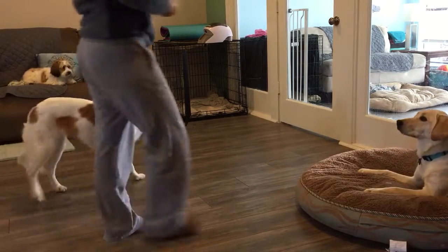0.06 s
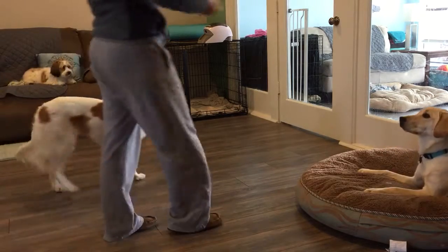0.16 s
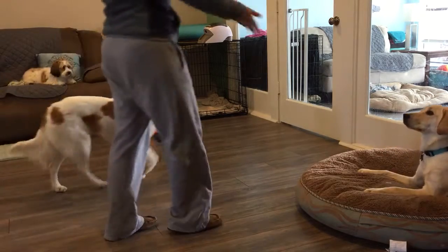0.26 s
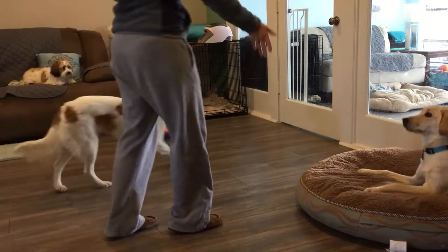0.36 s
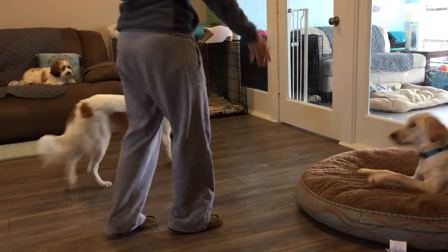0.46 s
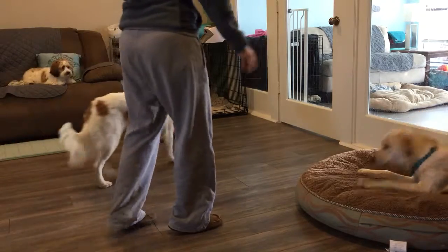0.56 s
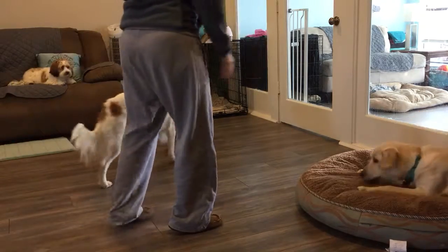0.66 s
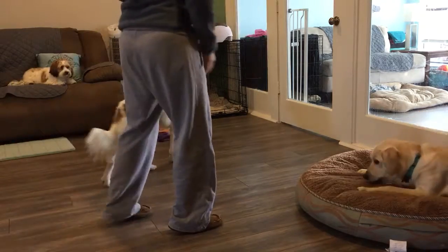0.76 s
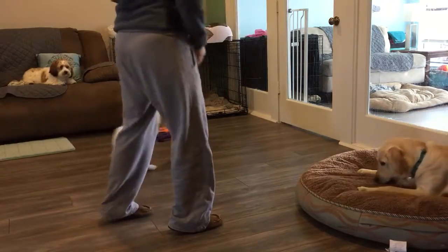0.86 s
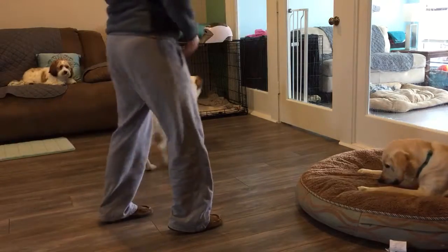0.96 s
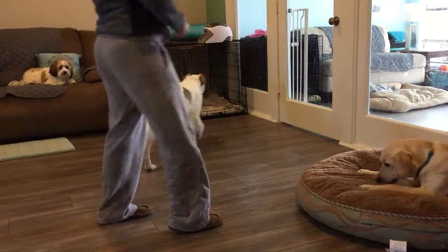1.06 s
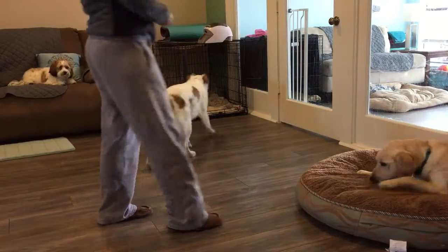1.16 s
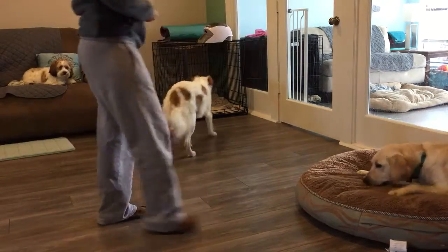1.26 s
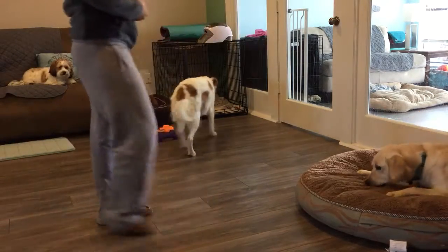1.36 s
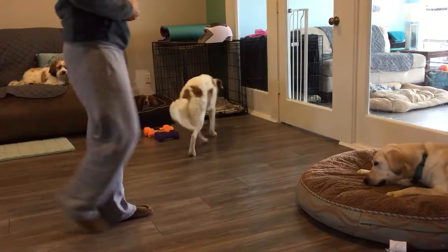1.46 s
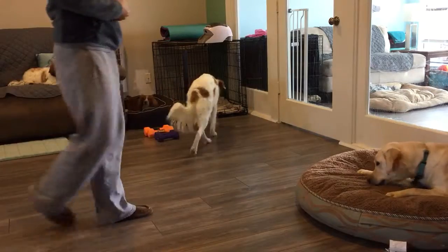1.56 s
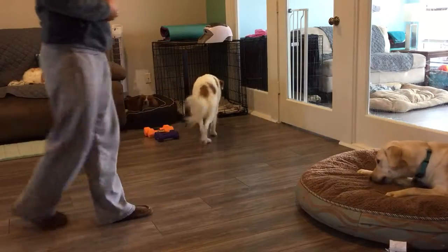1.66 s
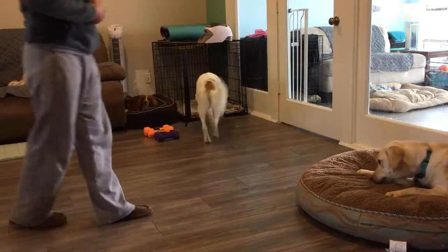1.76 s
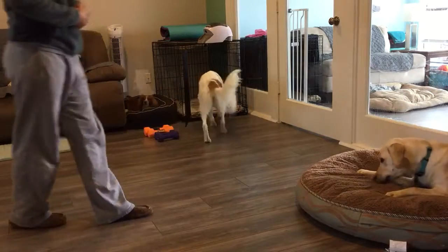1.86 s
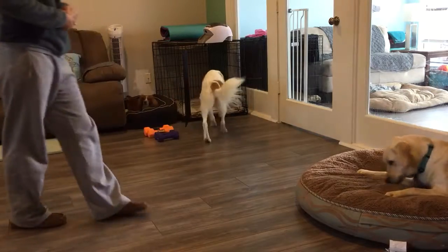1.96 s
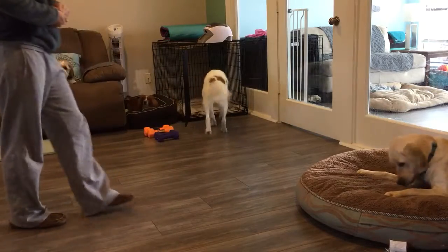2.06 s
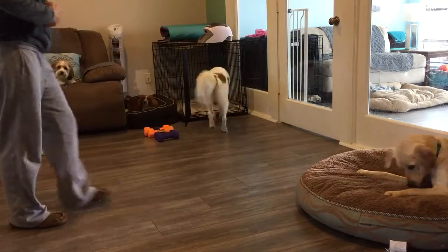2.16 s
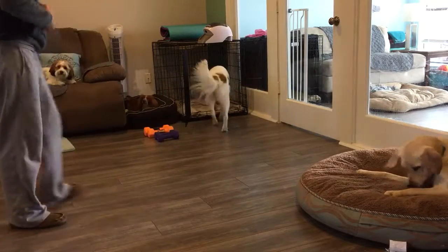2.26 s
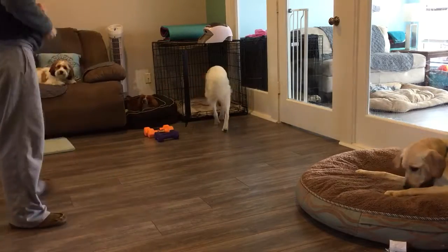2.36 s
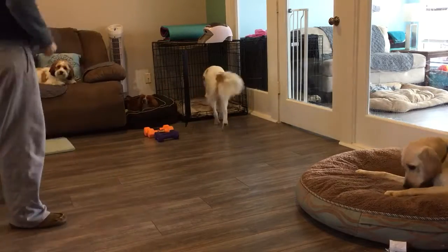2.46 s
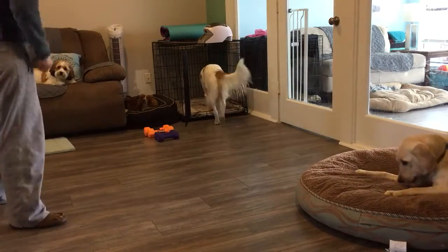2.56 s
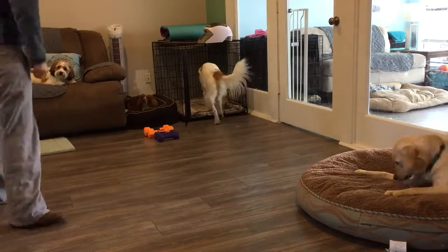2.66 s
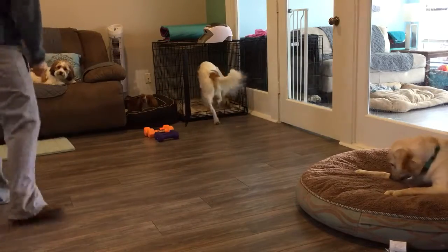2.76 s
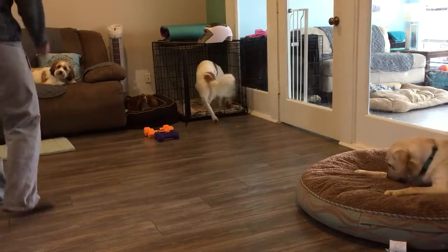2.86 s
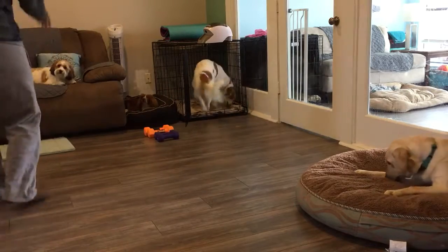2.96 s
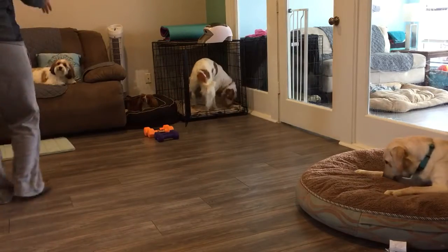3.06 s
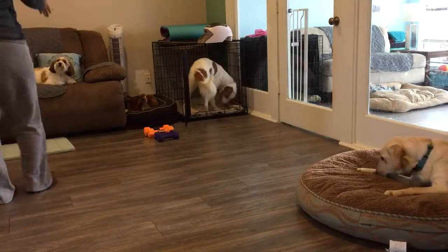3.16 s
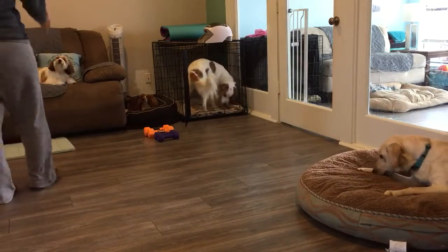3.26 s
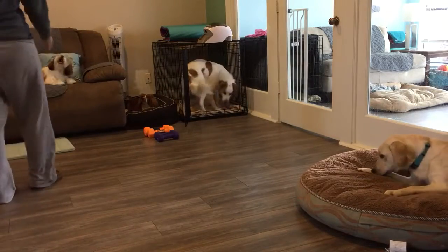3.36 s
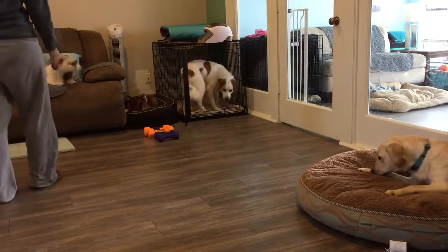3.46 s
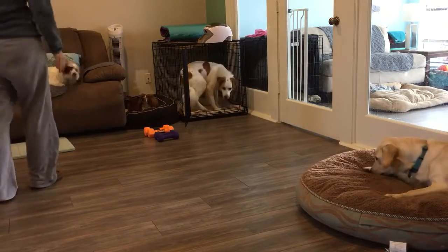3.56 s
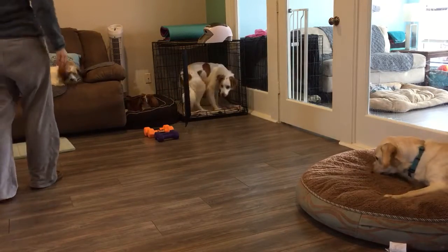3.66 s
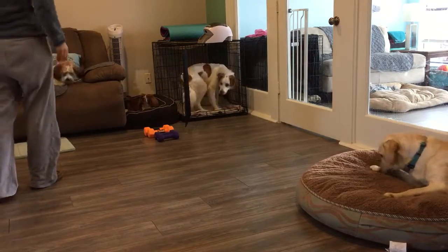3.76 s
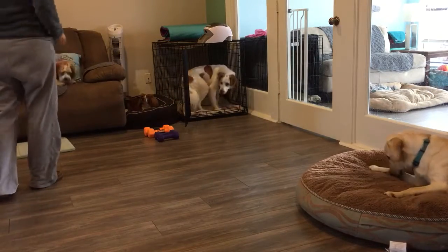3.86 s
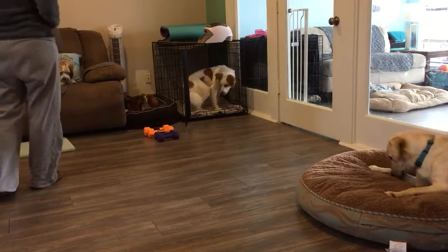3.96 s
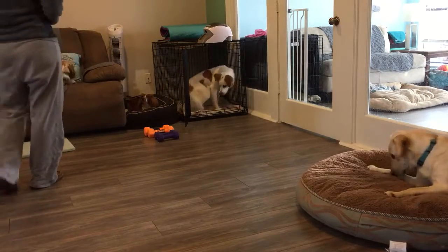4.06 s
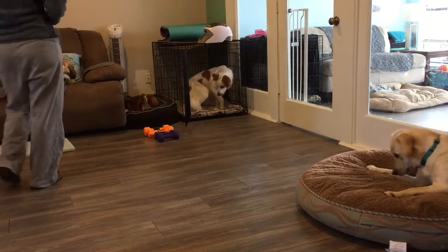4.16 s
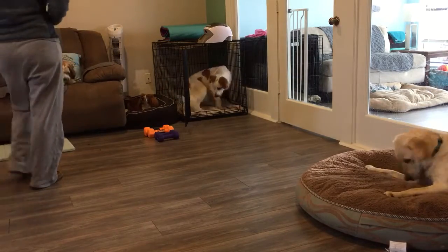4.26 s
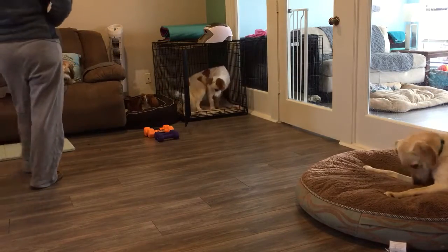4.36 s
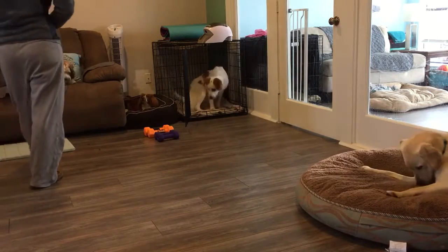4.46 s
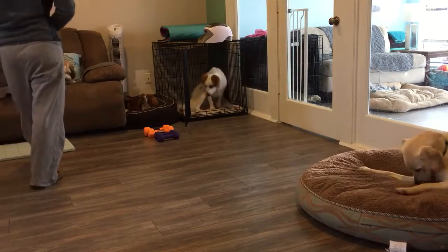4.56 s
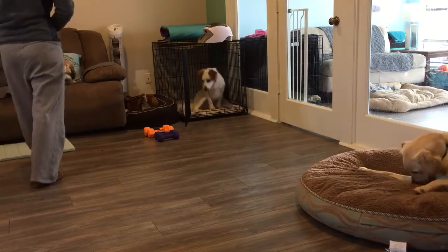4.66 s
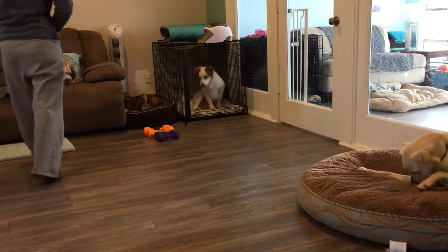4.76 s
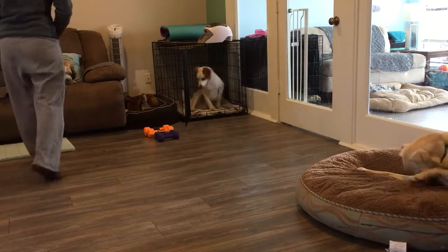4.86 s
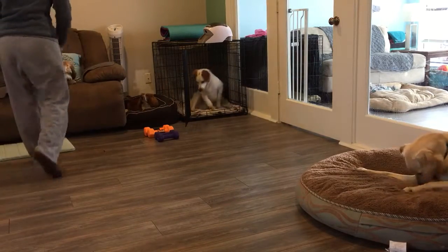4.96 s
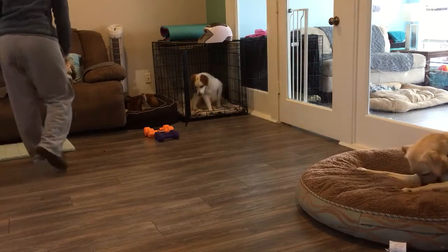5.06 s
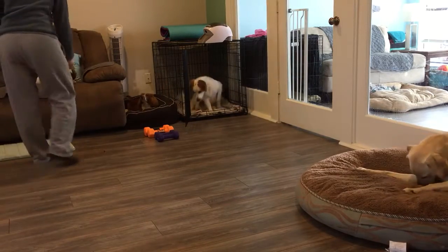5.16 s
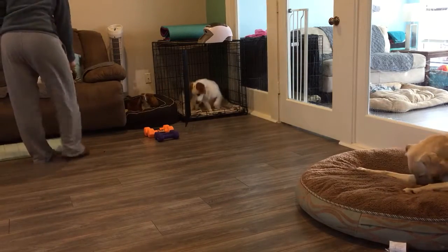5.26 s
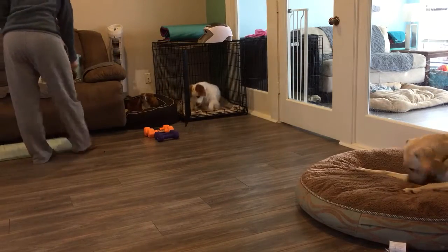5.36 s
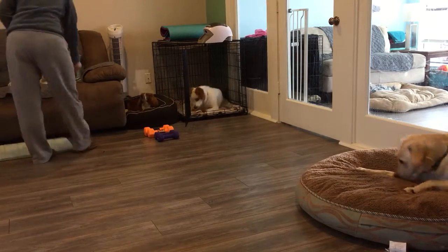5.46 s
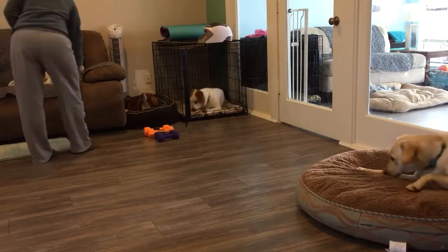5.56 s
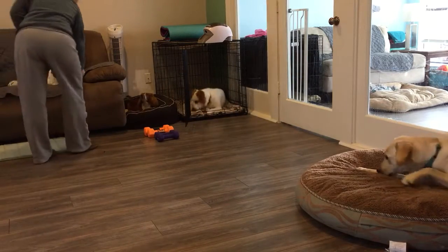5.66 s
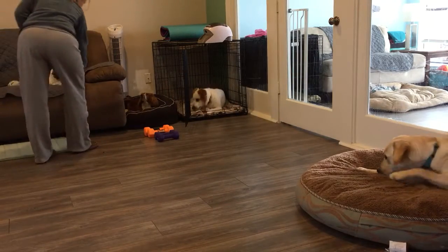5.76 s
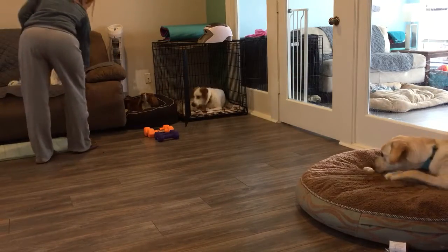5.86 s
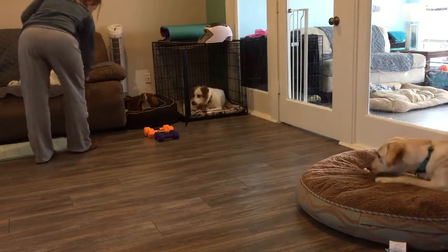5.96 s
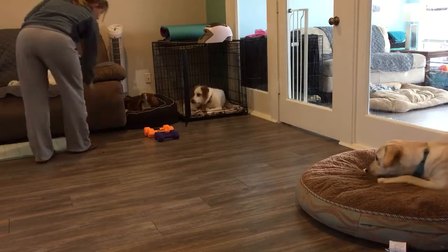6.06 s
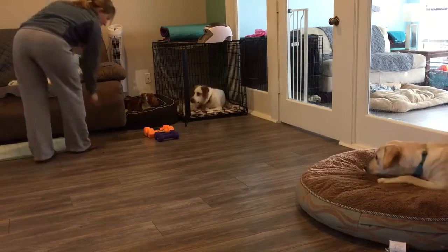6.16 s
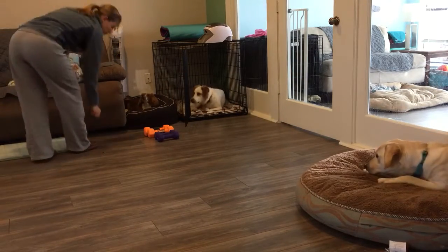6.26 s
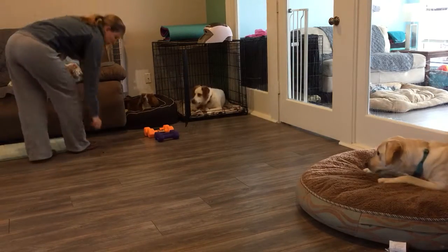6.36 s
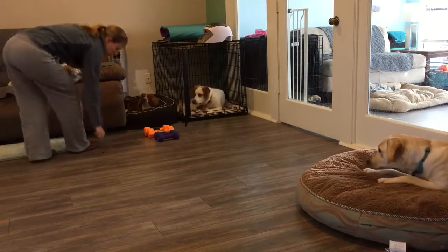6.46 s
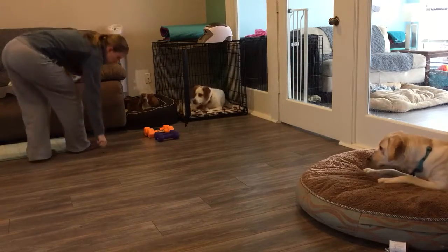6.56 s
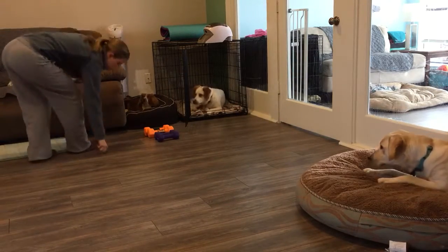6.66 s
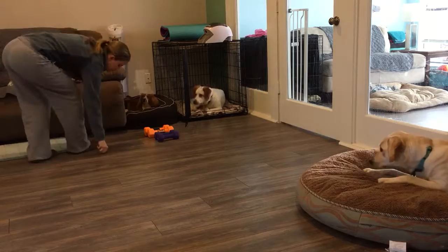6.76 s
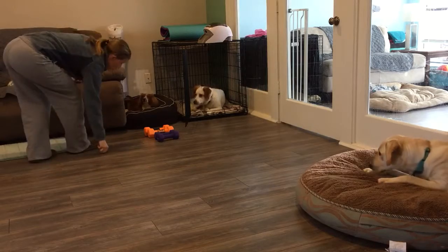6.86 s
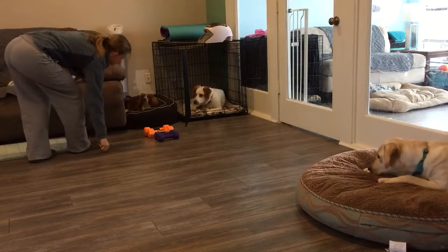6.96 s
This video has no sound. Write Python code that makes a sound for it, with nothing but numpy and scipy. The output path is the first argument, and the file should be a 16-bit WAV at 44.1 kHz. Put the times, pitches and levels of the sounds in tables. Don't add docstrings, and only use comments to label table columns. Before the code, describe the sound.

In a quiet, lively living room, a dog's tags tinkle as paws thump a plastic crate tray, claws click and wires briefly rattle.

```python
import sys
import numpy as np
from scipy import signal
from scipy.fft import rfft, irfft
from scipy.io import wavfile
from scipy.ndimage import uniform_filter1d

SR = 44100
rng = np.random.default_rng(int(sys.argv[2]) if len(sys.argv) > 2 else 0)


def to_wav(sig):
    pcm = np.clip(np.atleast_2d(sig), -1, 1) * 32767
    pcm = np.round(pcm).astype(np.int16)
    wavfile.write(sys.argv[1], SR, pcm.T)


def to_linear_factor(level_db):
    exponent = np.asarray(level_db, float) / 20
    return 10 ** exponent


N = 309141


def at_hz(points, hz):
    table_hz, values = np.array(points).T
    return np.interp(np.log(hz), np.log(table_hz), values)


def rms_one(x):
    return x / np.sqrt(np.mean(x ** 2) + 1e-20)


def coloured(size, points):
    hz = np.maximum(np.fft.rfftfreq(size, 1 / SR), 10)
    spectrum = rfft(rng.standard_normal(size)) * to_linear_factor(at_hz(points, hz))
    return rms_one(irfft(spectrum, size))


def peak(x, hz, width_hz):
    r = np.exp(-np.pi * width_hz / SR)
    forward = [(1 - r * r) / 2, 0, (r * r - 1) / 2]
    feedback = [1, -2 * r * np.cos(2 * np.pi * hz / SR), r * r]
    return signal.lfilter(forward, feedback, x)


def bright(x, cut_hz):
    return signal.sosfilt(signal.butter(2, cut_hz, "high", fs=SR, output="sos"), x)


def band(x, low_hz, high_hz):
    return signal.sosfilt(signal.butter(3, [low_hz, high_hz], "band", fs=SR, output="sos"), x)


def add(track, s, db, sound):
    i = round(s * SR)
    track[..., i:i + sound.shape[-1]] += to_linear_factor(db) * sound[..., :N - i]


def strike(track, s, db, sound):
    add(track, s - .0035, db - 16, sound)
    add(track, s, db, sound)


def top_one(x):
    energy = np.sqrt(np.sum(x ** 2, axis=1, keepdims=True))
    return x * energy[0] / energy / np.abs(x[0]).max()


def contact(length_s, size=3000):
    t = np.arange(size) / SR
    rough = rng.standard_normal(size) * t ** 2 * np.exp(-t / max(length_s / 3, 1e-4))
    pulse = (t == 0) * np.sqrt(np.sum(rough ** 2))
    return np.stack([rough, pulse])


def pushes(rows, width_share):
    out = np.zeros((2, N))
    for s, db, hz, length_s in rows:
        force = contact(length_s, size=9000)[[0, 0]]
        width_hz = width_share * hz
        ringing = peak(peak(force, hz, width_hz), hz, 0.99 * width_hz)
        add(out, s, db - 7, top_one(ringing))
    return out


def grainy(size, lump_db):
    return to_linear_factor(lump_db * rms_one(uniform_filter1d(rng.standard_normal(size), size=120)))


# (f/Hz, level/dB per Hz)
AIR_COLOUR = [(15, -50), (28, -23), (59, -8), (160, -12.5), (206, -5.5), (270, -14), (700, -21.5),
              (16000, -40)]
# (f/Hz, width/Hz, level/dB rms)
MOTOR_HUM = [(58.8, 18.6, -71.5), (205.27, 3.9, -67.5)]


def air():
    out = to_linear_factor(-63.5 - 3.5) * coloured(N, AIR_COLOUR)
    for hz, width_hz, db in MOTOR_HUM:
        tone = peak(peak(rng.standard_normal(N), hz, width_hz), hz, 1.1 * width_hz)
        out += to_linear_factor(db) * rms_one(tone)
    return out


def jingle(hits, modes):
    out, t = np.zeros(N), np.arange(22000) / SR
    touch = np.minimum(t / 0.00038, 1)
    for s, *group_db in hits:
        chance = rng.standard_normal((len(modes), 2))
        for (hz, mode_db, t60, group), (shift, uneven) in zip(modes, chance):
            shifted_hz = hz + shift * 1.53 / t60
            tone = np.sin(2 * np.pi * shifted_hz * t) * to_linear_factor(-60 * t / t60) * touch
            uneven_db = 3 * uneven * (t60 < .09)
            add(out, s, group_db[round(group)] + mode_db + uneven_db, tone)
    return out


def by_spot(db, spot, groups, far_db):
    return list(db + far_db * np.sin(np.pi * (spot - groups) / 4) ** 2)


# (t/s, clack level/dB, ringing level/dB, spot on the rim 1-5, loss opposite/dB)
FIRST_TAG_HITS = [(0.7672, -60, -65, 3.1, -20), (0.814, -54, -49, 3.17, -16), (0.889, -54, -51, 3.4, -24),
                  (0.926, -47.5, -62, 3.5, -35), (0.9662, -54, -58, 3.1, -23), (1.053, -61, -74, 2.7, -8),
                  (1.0899, -37, -41, 2.76, -29), (1.1119, -43, -51, 4.3, -16), (1.303, -69, -67, 4.4, -20),
                  (1.3254, -78, -58, 4.7, -28), (1.4333, -73, -73, 2.7, -26), (1.5044, -78, -72, 3.4, -26),
                  (1.5554, -73, -65, 3.7, -34), (1.7042, -42.5, -56, 2.3, -6),
                  (1.9099, -43, -59.5, 2.4, -15), (2.3344, -74, -69, 2.9, -33), (2.3484, -67, -60, 4, -11),
                  (3.6193, -66, -57, 2.9, -17), (3.7346, -53, -53, 3.7, -40), (3.7895, -55, -58, 3.3, -20),
                  (4.0194, -80, -61, 3.3, -34), (4.1422, -67, -65, 3.5, -26), (4.3994, -80, -76, 3.5, -25)]
# (f/Hz, level/dB, time to fall 60 dB/s, group; 0 is the short clack)
FIRST_TAG_TONES = [(10180, -12, .08, 0), (9850, -3, .012, 0), (10400, -3, .012, 0), (13150, -7, .015, 0),
                   (14900, -7, .01, 0), (6541, 0, .3, 1), (7940, 0, .25, 2), (14140, 0, .12, 3),
                   (14530, 2, .13, 4)]
# (t/s, level/dB, spot 0-4, loss opposite/dB)
SECOND_TAG_HITS = [(0.1093, -52, 0.48, -9), (0.1285, -51, .3, -23), (0.347, -57, 0.011, -30),
                   (0.5266, -65, 3.9, -12), (1.483, -47, .8, -34), (2.2918, -53, .01, -40),
                   (2.4413, -50, 3.9, -9), (2.724, -49.5, 0.53, -13), (2.855, -60.5, 0.092, -17),
                   (3.1218, -49.5, 1.3, -16), (3.3828, -51, 1.6, -20), (4.995, -65, 0.0081, -30),
                   (5.0572, -51.5, .5, -7)]
# (f/Hz, level/dB, time to fall 60 dB/s, group)
SECOND_TAG_TONES = [(8100, -1, .01, 0), (9050, -6, .025, 0), (6100, 0, .008, 1), (7100, 1, .008, 1),
                    (10500, 3, .02, 2), (11300, -3, .01, 2), (12500, -2, .008, 3), (13500, 0, .012, 3),
                    (15200, -3, .012, 3)]


def tags():
    first = [(s, clack_db, *by_spot(db, spot, np.arange(1, 5), far_db))
             for s, clack_db, db, spot, far_db in FIRST_TAG_HITS]
    second = [(s, *by_spot(db, spot, np.arange(4), far_db))
              for s, db, spot, far_db in SECOND_TAG_HITS]
    return jingle(first, FIRST_TAG_TONES) + jingle(second, SECOND_TAG_TONES)


# (t/s, peak level/dB, length/s)
BOARD_LANDINGS = [(0.66, -48, 0.032), (0.751, -53.5, 0.045), (0.883, -54.5, 0.042), (1.329, -58, .024),
                  (2.004, -57, 0.018), (2.628, -34, 0.049), (3.042, -45.5, 0.031), (3.135, -33, 0.034),
                  (3.19, -41, 0.019), (3.399, -49.5, 0.025), (4.193, -42, 0.021), (4.795, -36, 0.017),
                  (5.599, -43, 0.027)]
# (t/s, peak level/dB, length/s)
BOARD_CREAKS = [
    (0.238, -59, 0.011),
    (1.741, -49.5, 0.017),
    (2.282, -54.5, 0.012),
    (3.162, -42, .03),
    (3.841, -38.5, 0.0082),
    (4.54, -49, 0.024),
    (5.239, -38, 0.017),
    (5.671, -59, 0.023),
]
# (t/s, peak level/dB, length/s)
FLOOR_BOOMS = [
    (2.605, -39, 0.014),
    (4.170, -47, 0.012),
    (4.778, -41.5, 0.019),
    (5.225, -43.5, 0.039),
]


def floor():
    rows = []
    for table, hz in ((BOARD_LANDINGS, 216), (BOARD_CREAKS, 400), (FLOOR_BOOMS, 129.6)):
        rows += [(s, db, hz, length_s) for s, db, length_s in table]
    return pushes(rows, width_share=0.61)


# (from f/Hz, to f/Hz)
TRAY_REGIONS = [
    (750, 1600),
    (340, 700),
    (1500, 3100),
    (3000, 8200),
]
# (t/s, panel level/dB, low body level/dB over the panel)
PAD_KNOCKS = [(0.241, -52.5, 1), (0.877, -60, -1.5), (1.648, -51, -12), (2.59, -36, -14),
              (2.598, -37.5, -9), (2.604, -25, -12.5), (2.611, -22, -20.5), (3.031, -32, -20),
              (3.392, -45, -5.5), (4.157, -37.5, -33), (4.166, -42, -10.5), (4.177, -36.5, -10),
              (4.185, -38, -11), (4.649, -51, -2.5), (4.699, -42, -10), (4.782, -23.5, -13.5),
              (5.21, -41, -12), (5.219, -28, -30), (5.228, -24, -23.5), (5.518, -55.5, -1.5),
              (5.671, -50, -0.5), (5.735, -53, -3.5)]
# (t/s, rim level/dB, crack level/dB over the rim)
EDGE_KNOCKS = [(0.241, -62, -4), (1.648, -57, -14), (2.598, -38, -8), (2.604, -26.5, -25.5),
               (3.03, -40, -13), (4.168, -50, -20), (4.178, -35.5, -9), (4.185, -45, -1.5),
               (4.699, -43.5, -35), (4.7751, -25.5, -17.5), (5.21, -48.5, -3.5), (5.219, -37, -37),
               (5.671, -59, -4)]


def knocks():
    out = np.zeros((2, N))
    # time, level, shares of panel, low body, rim and crack in dB, contact length in s
    pads = [(s, db, (0, low_db, -35.5, -26), 0.0029) for s, db, low_db in PAD_KNOCKS]
    nails = [(s, db, (-8.5, -22.5, 0, crack_db), .0045) for s, db, crack_db in EDGE_KNOCKS]
    trims_db = (1.0, 5, 6.5, 4.5)
    for s, db, parts_db, contact_s in pads + nails:
        force = contact(contact_s)
        for part_db, (low_hz, high_hz), trim_db in zip(parts_db, TRAY_REGIONS, trims_db):
            strike(out, s, db + part_db + trim_db, top_one(band(force, low_hz, high_hz)))
    return out


# (start t/s, level/dB rms, length/s, centre f/Hz, brightness level/dB)
RUBS = [(0.249, -57.5, 0.018, 2600, -7), (0.625, -59.5, 0.071, 3004, -40), (1.052, -57, .02, 3000, -17),
        (1.068, -56, 0.046, 3080, -31), (1.325, -63, .04, 3400, -26), (1.643, -70, 0.1, 3180, -7),
        (1.648, -61.5, 0.047, 1030, -30), (1.924, -62.5, 0.066, 2530, -32), (3.332, -60, 0.076, 2170, -26),
        (3.381, -58, 0.018, 1100, -16), (3.13, -63.5, 0.086, 1480, -25), (4.64, -68.5, 0.033, 2900, -27),
        (6.295, -74, .08, 2760, -21), (6.412, -69.5, 0.061, 3080, -7), (6.547, -64.5, 0.035, 2470, -19),
        (6.858, -70, .028, 2170, -23)]


def scuffs():
    out, t = np.zeros(N), np.arange(16000) / SR
    for s, db, length_s, hz, bright_db in RUBS:
        noise = rng.standard_normal(len(t)) * grainy(len(t), lump_db=2)
        body = rms_one(bright(peak(noise, hz, 0.6 * hz), 0.18 * hz))
        hiss = rms_one(peak(bright(noise, 3800), 4100, 4700))
        rise_s = 0.48 * length_s
        fading = np.exp((rise_s - t) / (length_s - rise_s))
        swell = np.where(t < rise_s, t / rise_s, fading)
        add(out, s, db, (body + to_linear_factor(bright_db) * hiss) * swell)
    return out


# (t/s, peak level/dB, f/Hz, brightness level/dB)
CLAW_TICKS = [(0.2605, -48.5, 2270, -14.5), (0.5042, -62, 2460, -9), (0.543, -57, 3570, -22),
              (0.9094, -50.5, 3050, -16), (1.064, -37, 3160, -16), (1.3217, -44.5, 3080, -19),
              (1.473, -35.5, 3026, -18.5), (1.6425, -54, 2400, -9), (1.884, -40.5, 2700, -19),
              (2.1497, -43, 2850, -20), (2.2815, -52, 2800, -25), (2.572, -44, 2950, -19),
              (2.8, -40.5, 3000, -26), (3.3297, -55, 2900, -12), (3.841, -30.5, 3270, -1.5),
              (3.8461, -24, 2700, -18.5), (4.005, -36, 2760, -17.5), (4.1806, -41.5, 2340, 5),
              (4.325, -34.5, 3036, -15.5), (4.4465, -38.5, 3080, -15.5), (5.5164, -58, 2165, -25),
              (6.1724, -64, 2220, -18)]


def claws():
    out = np.zeros((2, N))
    skips = [(4.504 + k * .041, -43.5 - k * 1.5, 2900, -27) for k in range(3)]
    for s, db, hz, bright_db in CLAW_TICKS + skips:
        bright_db = min(bright_db, 0)
        force = contact(0.0033)
        body = top_one(peak(band(force, 0.5 * hz, 1.71 * hz), hz, 0.27 * hz))
        edge = top_one(peak(bright(force, 3300), 5300, 3600))
        strike(out, s, db + 1.5, body + to_linear_factor(bright_db - 9) * edge)
        bounce_s = .0105
        add(out, s + bounce_s, db + bright_db + 8.0, edge)
    return out


# (t/s, level/dB, f/Hz, length/s)
SMALL_SQUEAKS = [
    (.930, -56, 1245, 0.029),
    (2.160, -56, 5160, 0.017),
    (2.160, -52, 2660, 0.02),
    (2.340, -55, 1250, 0.022),
    (6.560, -54, 1540, 0.012),
    (6.565, -55, 4220, .015),
    (6.955, -52, 2740, 0.0063),
]


def squeaks():
    return pushes(SMALL_SQUEAKS, width_share=.11)


# (f/Hz, level/dB per Hz)
FUR_COLOUR = [(180, -34), (300, -9), (431, -3), (968, -6), (3400, -1.5), (4140, -15.5), (5760, -16.5),
              (15500, -39)]
# (f/Hz, width/Hz, level/dB)
WIRE_TONES = [(1250, 100, -6), (1580, 80, -5), (2300, 80, -3), (3350, 30, 9), (4600, 90, -7),
              (5800, 110, -6), (8300, 200, -13)]


def slide():
    start_s, stop_s, rise_s, fall_s = 5.574, .205, 0.03, 0.056
    t = np.arange(N) / SR - start_s
    rising = to_linear_factor(-9.5 * (1 - t.clip(0, 1) / rise_s))
    falling = np.exp((rise_s - t.clip(0)) / fall_s)
    level = to_linear_factor(-46) * (t > 0) * (t < stop_s) * np.minimum(rising, falling)
    grip = grainy(N, lump_db=2.5)
    shaking = rng.standard_normal(N) * grip
    wires = np.zeros(N)
    for hz, width_hz, wire_db in WIRE_TONES:
        wires += to_linear_factor(wire_db) * rms_one(peak(shaking, hz, width_hz)) * np.sqrt(width_hz)
    fur = coloured(N, FUR_COLOUR) * grip
    return level * (fur + to_linear_factor(-1.5) * rms_one(wires))


# (f/Hz, time to fall 60 dB/s)
ROOM_RINGING = [(150, 0.43), (500, 0.51), (1400, 0.57), (3700, 0.46), (7000, 0.51), (14000, 0.19)]
# (delay t/s, level/dB)
FIRST_ECHOES = [(.0052, -6.5), (.0105, -7.5), (.0163, -24.5), (.0241, -11), (.0317, -29)]


def room(direct, gathered):
    t = np.arange(round(.8 * SR)) / SR
    tail, edges = 0, 80 * 2 ** np.arange(0, 8, .5)
    for low, high in zip(edges, edges[1:]):
        half_octave = signal.butter(2, [low, high], "band", fs=SR, output="sos")
        noise = signal.sosfilt(half_octave, rng.standard_normal(len(t)))
        tail = tail + noise * to_linear_factor(-60 * t / at_hz(ROOM_RINGING, np.sqrt(low * high)))
    tail = tail * (1 - np.exp(-(t / .014) ** 2))
    early = (t == 0) * 1.0
    for delay_s, db in FIRST_ECHOES:
        early[round(delay_s * SR)] += to_linear_factor(db)
    late = to_linear_factor(-3.5) * tail / np.sqrt(np.sum(tail ** 2))
    return (signal.fftconvolve(direct, early) + signal.fftconvolve(gathered, late))[:N]


def scene():
    def to_room(db):
        return to_linear_factor([[0], [db]])

    mix = tags() * to_room(-4) + floor() + knocks()
    mix = mix + scuffs() * to_room(-2.5) + claws() * to_room(-2.5)
    mix = mix + squeaks() * to_room(-7) + slide() * to_room(-9.5)
    direct, gathered = mix
    mono = room(direct, gathered) + air()
    return np.stack([mono, mono])


def band_limit(x):
    return signal.sosfilt(signal.butter(12, 16390, fs=SR, output="sos"), x)


def record(dry):
    x = signal.sosfilt(signal.butter(2, 30, "high", fs=SR, output="sos"), dry)
    x = signal.sosfilt(signal.cheby2(14, 60, 16150, fs=SR, output="sos"), x)
    return band_limit(x)


dry = scene()
out = record(dry)
to_wav(out)
```